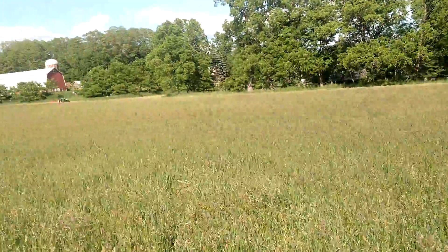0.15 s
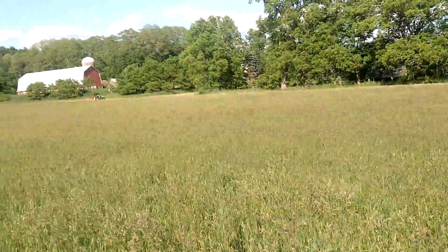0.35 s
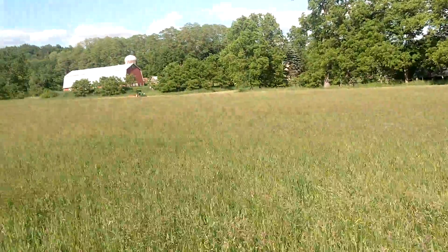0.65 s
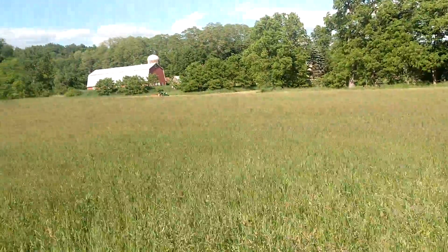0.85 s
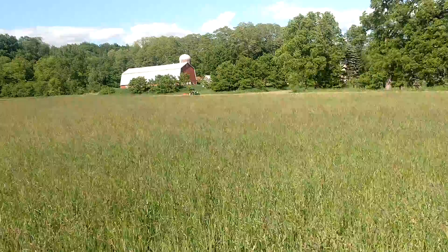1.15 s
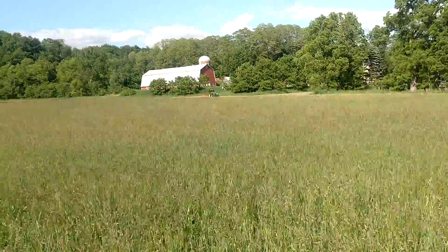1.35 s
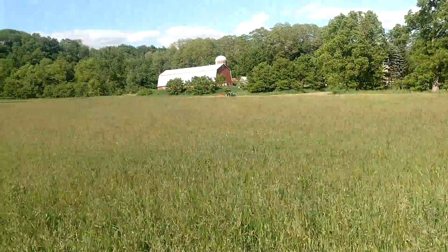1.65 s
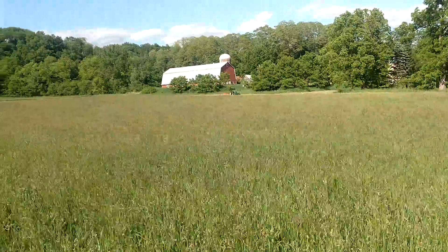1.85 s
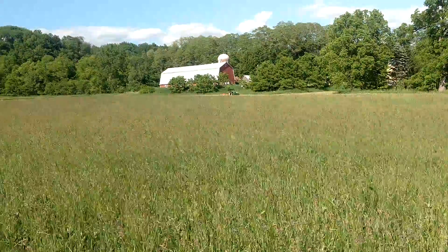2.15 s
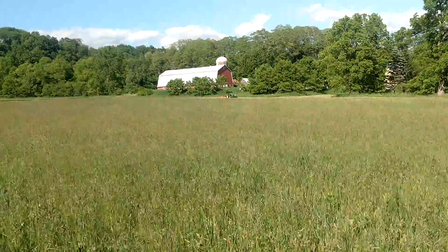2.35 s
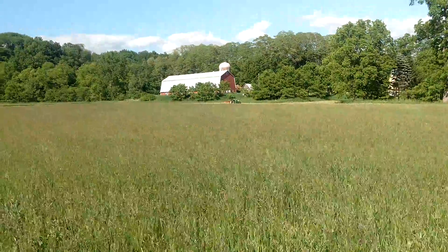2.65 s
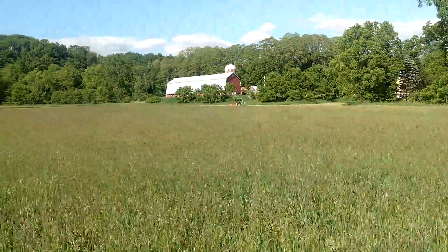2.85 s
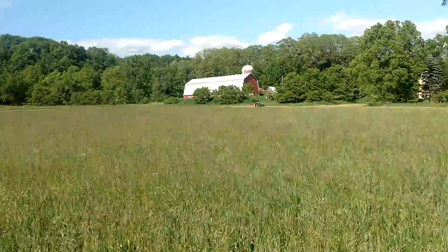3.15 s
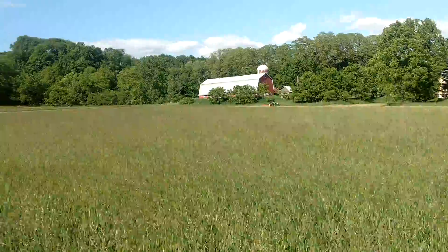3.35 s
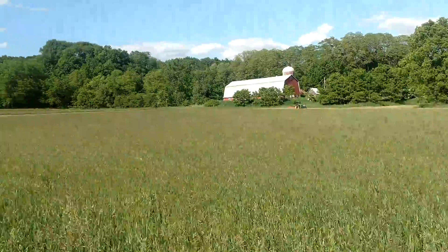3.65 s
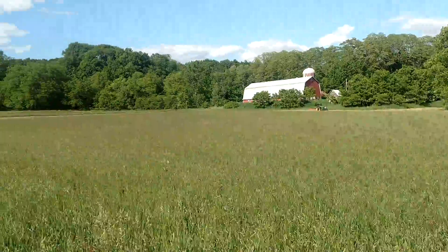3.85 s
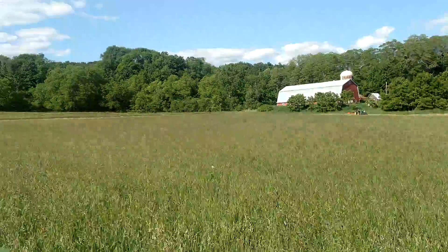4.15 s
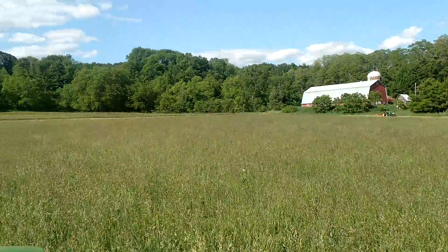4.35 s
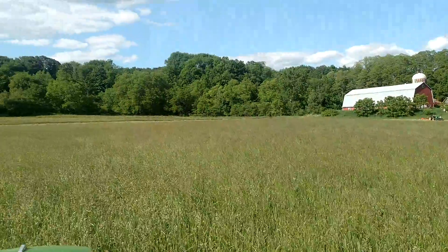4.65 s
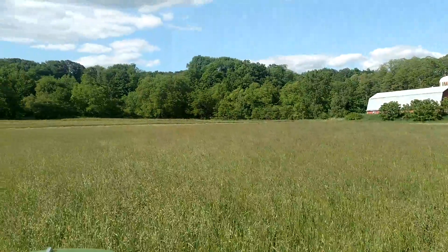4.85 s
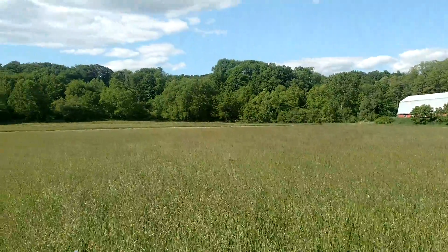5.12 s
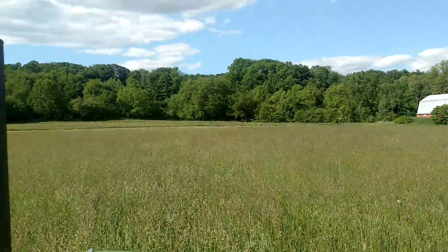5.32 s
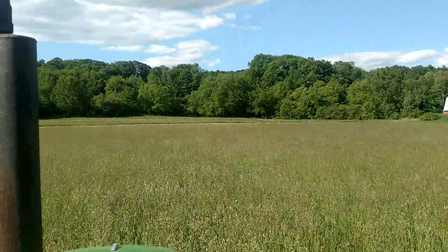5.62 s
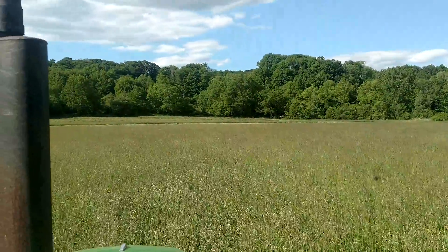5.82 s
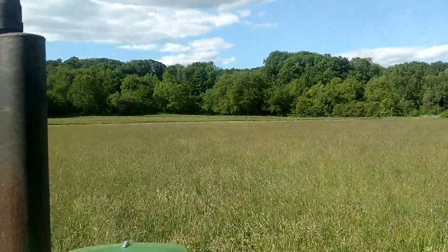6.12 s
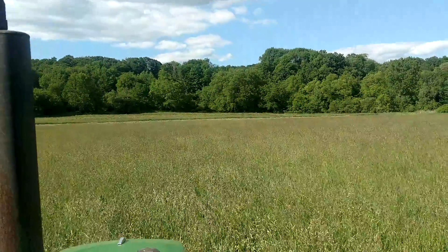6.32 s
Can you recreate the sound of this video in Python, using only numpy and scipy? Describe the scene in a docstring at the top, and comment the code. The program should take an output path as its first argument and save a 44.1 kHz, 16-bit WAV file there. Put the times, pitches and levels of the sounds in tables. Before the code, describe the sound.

A diesel tractor engine runs steadily at high working speed with fan hum, gear whine, throbbing mower drive and hissing cut grass, heard from the seat.

```python
"""Tractor mowing hay

A three-cylinder diesel runs at a governed speed, heard from the open driver's seat. Combustion knock repeats
each engine cycle over a random rush of fan air and cut grass. Fan and rotors hum, gears whine and the mower
drive sings in throbs, all as roughened partials; a dry joint chirps and wind puffs on the microphone.
From just before four seconds the microphone turns from the field to face the bonnet."""
import sys
import numpy as np
from scipy.fft import rfft, irfft
from scipy.io import wavfile
from scipy.ndimage import map_coordinates

SR = 44100
rng = np.random.default_rng(int(sys.argv[2]) if len(sys.argv) > 2 else 0)


def waveform_to_disk(signal):
    """Save audio, clipped to [-1, 1], as 16-bit WAV at the path in sys.argv[1]."""
    frames = np.transpose(np.atleast_2d(signal))
    scaled = np.clip(frames, -1, 1) * 32767
    samples = np.round(scaled).astype(np.int16)
    wavfile.write(sys.argv[1], SR, samples)


N = 285768
TIME = np.arange(N) / SR
FREQ = np.maximum(np.fft.rfftfreq(N, 1 / SR), 1)

# Strong engine lines. Each row: multiple of the four-stroke cycle rate (rounded in use),
# relative level in dB facing the field, relative level in dB facing the bonnet.
ENGINE_LINES = [(6, -37.5, -41), (9, -33, -30), (10, -39, -35.5), (26, -34.5, -42), (30, -36.5, -36),
                (31, -43.5, -31.5), (33, -34.5, -30), (35, -41, -31), (42, -60.5, -32), (47, -32, -40),
                (66.06, -33.5, -32.5), (68.8, -40, -49), (72.26, -32, -27)]


def undb(db):
    """Decibels to gain."""
    return 10 ** (np.asarray(db) / 20)


def curve(rows):
    """A table of time and value, joined by straight lines at every sample."""
    time_s, value = np.transpose(rows)
    return np.interp(TIME, time_s, value)


def shape(points):
    """A frequency table joined on a log axis."""
    hz, value = np.transpose(points)
    return np.interp(np.log(FREQ), np.log(hz), value)


def colour(x, gain):
    """Filter by a gain for each frequency."""
    return irfft(rfft(x) * gain, N)


def walk(rate_hz):
    """Smooth chance of unit spread: noise through a Gaussian low-pass of the given width."""
    x = colour(rng.standard_normal(N), np.exp(-.5 * (FREQ / rate_hz) ** 2))
    return x / x.std()


def swell(from_crest_s, length_s):
    """A rounded rise and fall."""
    return np.exp(-(2 * from_crest_s / length_s) ** 2)


def place(x, pan_db, lag_ms=0):
    """A source at both ports; a positive lag reaches the left port late."""
    left = colour(x, np.exp(-2j * np.pi * FREQ * lag_ms / 10 ** 3))
    return np.array([left * undb(pan_db / 2), x * undb(-pan_db / 2)])


def turned(start_s=3.78, length_s=0.97, before=0.14):
    """Share of the turn towards the bonnet, 0-1, part of it made before the start."""
    return before + (1 - before) * np.clip((TIME - start_s) / length_s, 0, 1)


def swing(x, field, bonnet):
    """The turn crossfades a source between two places, each (pan dB, lag ms)."""
    return place(x * (1 - turned()), *field) + place(x * turned(), *bonnet)


def load():
    """How far the crop is above or below its mean thickness, in dB; it also loads the engine."""
    # Crop thickness, as the level of its hiss. Each row: time in seconds, level in dB (only its swing counts).
    crop_rows = [(0.0, -33.5), (0.11, -35), (0.61, -35), (0.85, -32.5), (0.9, -36.5), (1.46, -33),
                 (2.02, -36), (2.4, -33), (2.45, -36), (2.96, -34.5), (3.3, -35), (3.48, -33), (3.93, -36),
                 (3.97, -32.5), (4.78, -34), (4.95, -32), (5.0, -34), (6.48, -34)]
    crop_db = curve(crop_rows)
    return crop_db - crop_db.mean()


def tone(hz, partials, wander, rough, rough_hz):
    """A turning part: its speed wanders, and play between the parts spreads each line into a skirt."""
    angle = 2 * np.pi * np.cumsum(hz * (1 + wander * walk(3.13))) / SR
    out = 0
    for k, db in partials:
        spread = rough * np.sqrt(k)
        play = walk(rough_hz) + 1j * walk(rough_hz)
        skirt = (1 + spread * play) / np.sqrt(.5 + spread ** 2)
        out = out + undb(db) * np.real(skirt * np.exp(1j * k * angle))
    return out


def wind(centre_hz=72, spread=.24, puff_s=0.087, breeze_db=-47):
    """Eddies push the two ports in opposite directions."""
    # Puffs of wind on the microphone. Each row: crest in seconds, level in dB.
    puffs = [(.82, -26), (1.1, -36), (1.92, -34), (2.7, -39), (5.5, -27)]
    band = np.exp(-.5 * (np.log(FREQ / centre_hz) / spread) ** 2)
    eddies = colour(rng.standard_normal(N), band)
    strength = undb(breeze_db + 3 * walk(3))
    for crest_s, db in puffs:
        strength = strength + undb(db) * np.exp(-.5 * ((TIME - crest_s) / puff_s) ** 2)
    return eddies / eddies.std() * strength * np.array([[1], [-.8]])


def bouts(rest_db=-47, fade_s=0.08):
    """The joint chirps in bouts that fade in, hold and fade out."""
    # Bouts of chirping. Each row: start in seconds, length in seconds, level in dB, added to the rest level.
    bout_rows = [(.13, 0.15, -40.5), (1.044, 0.46, -42.5), (2.03, 0.4, -44), (4.548, 0.5, -38.5),
                 (5.49, 0.18, -41), (5.872, 0.14, -38)]
    level = undb(rest_db)
    for start_s, length_s, db in bout_rows:
        to_edge_s = np.minimum(TIME - start_s, start_s + length_s - TIME)
        level = level + undb(db) * np.clip(.5 + to_edge_s / fade_s, 0, 1)
    return level


def squeak(base_hz=3395, shake_hz=14.5, bend=0.011, rub_depth=0.48, chatter_db=1):
    """A dry joint rubs unevenly, hardest once per shake, its pitch bending as it goes."""
    shake = 2 * np.pi * np.cumsum(shake_hz * (1 + .3 * walk(7))) / SR
    rub = np.exp(rub_depth * np.cos(shake)) * undb(chatter_db * walk(15))
    bent_hz = base_hz * (1 - bend * np.sin(shake))
    # one partial, at 0.99 of the base
    chirp = tone(bent_hz, [(0.99, 0)], wander=0.0069, rough=0.31, rough_hz=55)
    return chirp * rub / np.sqrt(np.mean(rub ** 2)) * bouts()


def mower_rotor(speed, rotor_hz=377.8, field_db=-28, bonnet_db=-37):
    """The rotors hum as a close pair of rough lines, weaker facing the bonnet."""
    # Each row: multiple of the rotor rate, relative level in dB.
    partials = [(1, 0), (1.062, -5)]
    level_db = field_db + turned() * (bonnet_db - field_db)
    return tone(rotor_hz * speed, partials, wander=0.002, rough=0.23, rough_hz=6.0) * undb(level_db)


def throbs(rate_hz=3.38, crest_s=0.32, length_s=.15, throb_db=-35, rest_db=-44, surge_s=0.12):
    """The mower drive throbs at a steady rate over a rest level and swells harder at times."""
    # Stronger swells of the drive's singing. Each row: crest in seconds, added level in dB.
    surge_rows = [(1.52, -32), (2.18, -37.5), (2.95, -33.5), (3.46, -30.5), (3.95, -35), (4.36, -27),
                  (5.359, -31.5), (5.71, -37)]
    from_crest_s = (((TIME - crest_s) * rate_hz + .5) % 1 - .5) / rate_hz
    level = undb(rest_db) + undb(throb_db) * swell(from_crest_s, length_s)
    for surge_crest_s, db in surge_rows:
        level = level + undb(db) * swell(TIME - surge_crest_s, surge_s)
    return level


def mower_drive(speed, drive_hz=942.5):
    """The mower drive sings at its tooth rate and multiples, in throbs."""
    # Each row: multiple of the tooth rate, relative level in dB.
    partials = [(1, 0.5), (2, -14), (3, -15), (5, -27)]
    return tone(drive_hz * speed, partials, wander=0.00297, rough=0.56, rough_hz=28) * throbs()


def gear_whine(speed, gear_hz=844.2):
    """Transmission teeth whine at their meshing rate and its multiples."""
    # Each row: multiple of the tooth rate, relative level in dB.
    partials = [(1, -7.5), (2, 3), (3, -7), (4, -10), (5, -13), (6, -14)]
    # Course of the whine. Each row: time in seconds, level in dB.
    level_rows = [(0.0, -27), (0.14, -35), (0.79, -33), (1.03, -41), (1.19, -33.5), (4.04, -31.5),
                  (4.1, -40), (5.07, -29.5), (5.47, -40.5), (5.63, -32), (5.97, -38.5), (6.14, -27),
                  (6.48, -42)]
    whine = tone(gear_hz * speed, partials, wander=0.001215, rough=0.22, rough_hz=17.5)
    return whine * undb(curve(level_rows))


def fan_level(level_db=-21, load_share=0.9, flutter_db=0.73, beat_hz=4.06, beat_crest_s=0.13, beat_db=1.0):
    """The fan hum beats against the engine, flutters by chance and grows with the load."""
    beat = np.cos(2 * np.pi * beat_hz * (TIME - beat_crest_s))
    return undb(level_db + load_share * load() + beat_db * beat + flutter_db * walk(2.2))


def cooling_fan(speed, fan_hz=199.25):
    """The fan hums at its blade rate."""
    # Each row: multiple of the blade rate, relative level in dB.
    partials = [(1, 0), (2, -15)]
    return tone(fan_hz * speed, partials, wander=0.0017, rough=0.092, rough_hz=26) * fan_level()


def knock(cycles, decay, depth, uneven):
    """Three firings a cycle, each dying away; one cylinder knocks harder."""
    firing = 1 + depth * np.exp(-(3 * cycles % 1) / decay)
    push = firing * (1 + uneven * np.cos(2 * np.pi * cycles))
    return push / np.sqrt(np.mean(push ** 2))


def clatter(cycles, size=8192, firing_db=4.0):
    """Valves, injectors and pistons make the same rattle in every cycle; multiples of the firing rate stand out."""
    push = knock(np.arange(size) / size, decay=0.068, depth=1.0, uneven=0.12)
    lines = rfft(rng.standard_normal(size) * push)
    k = np.arange(len(lines))
    below_nyquist = k * cycles[-1] / TIME[-1] < SR / 2
    lines = lines / abs(lines) * undb(firing_db * (k % 3 == 0)) * below_nyquist
    lines[[round(row[0]) for row in ENGINE_LINES]] = 0  # the exhaust and block sound these
    x = map_coordinates(irfft(lines), [cycles % 1 * size], order=3, mode="grid-wrap")
    return x / x.std()


def drone(cycles, waver=0.56, flutter_db=1.7):
    """Exhaust and engine block ring on a few cycle multiples, which change as the listener turns."""
    turn, out = turned(), 0
    for k, field_db, bonnet_db in ENGINE_LINES:
        line = np.cos(2 * np.pi * (round(k) * cycles + rng.random()) + waver * walk(7.9))
        level_db = field_db + turn * (bonnet_db - field_db) + flutter_db * walk(1.4)
        out = out + np.sqrt(2) * undb(level_db) * line
    # the upper lines come off the block, to one side; the exhaust boom surrounds the seat
    block = colour(out, 1 / (1 + (700 / FREQ) ** 6))
    return place((out - block) * undb(-2.5), 2.0) + place(block * undb(-6.0), 8.7)


def machine(cycles, left_db=1.5, rush_db=-2, load_share=0.69, hiss_share=0.91, hiss_hz=2200,
            panel_hz=560, patchy_db=2, bonnet_db=1.5, roar_flutter_db=.5, hiss_flutter_db=0.79):
    """Repeating clatter plus a random rush of air, combustion and cut grass, arriving from all sides."""
    # Broad sound of the whole machine. Each row: frequency in Hz, relative level in dB per Hz.
    spectrum = [(30, -84), (52, -58.5), (100, -48.5), (170, -50.5), (290, -55.5), (480, -49.5),
                (1000, -50.5), (1280, -50), (1550, -54), (1900, -54), (2300, -56.5), (3000, -61.5),
                (5400, -65), (11300, -74.5), (15000, -79.5)]
    # Clatter that repeats with the engine cycle. Each row: frequency in Hz, relative level in dB.
    repeating = [(60, -3), (250, -4.5), (700, -5.5), (1200, -2.5), (2000, -10.5), (5000, -9.5),
                 (12000, -45)]
    # Likeness of the two ports. Each row: frequency in Hz, correlation (clipped to +-1 in use).
    likeness = [(55, -1.38), (100, -0.71), (170, 0.45), (280, 1), (390, 0.61), (600, 0.77), (1000, -0.26),
                (2000, -0.0067)]
    rattle = colour(np.array([clatter(cycles), clatter(cycles)]), undb(shape(repeating)))
    rush = undb(rush_db) * rng.standard_normal((2, N))
    a, b = rfft(rattle + rush) * undb(shape(spectrum)) * np.sqrt(SR / 2)
    alike = np.clip(shape(likeness), -1, 1)
    mid, side = a * np.sqrt((1 + alike) / 2), b * np.sqrt((1 - alike) / 2)
    ports = irfft(np.array([mid + side, mid - side]), N) * undb([[left_db / 2], [-left_db / 2]])

    # the roar pulses with the firings and swells with the load; the hiss follows the grass
    hiss = colour(ports, 1 / (1 + (hiss_hz / FREQ) ** 4))
    roar_db = load_share * load() + roar_flutter_db * walk(5.9)
    hiss_db = hiss_share * load() + hiss_flutter_db * walk(12)
    # loose panels shudder unevenly, louder facing the bonnet
    panels = colour(ports, np.exp(-(np.log(FREQ / panel_hz) / 0.13) ** 2))
    shudder = undb(patchy_db * walk(15) + bonnet_db * turned()) - 1
    roar = ports - hiss + panels * shudder
    roar = roar * knock(cycles, decay=0.059, depth=0.16, uneven=0.03) * undb(roar_db)
    return roar + hiss * knock(cycles, decay=0.23, depth=0.19, uneven=0.011) * undb(hiss_db)


def scene(start_rpm=1950, creep_rpm_per_s=.8):
    """All but the joint and the wind turns with the crankshaft, governed but creeping up a little."""
    rpm = start_rpm + creep_rpm_per_s * TIME
    cycles = np.cumsum(rpm / 120) / SR  # two turns a cycle
    speed = rpm / rpm.mean()
    mower = place(mower_rotor(speed), 0.89) + place(mower_drive(speed), 15.5)
    gears = swing(gear_whine(speed), (11, .08), (9, -.11))
    fan = swing(cooling_fan(speed), (4.4, .94), (2.2, .94))
    engine = machine(cycles) + drone(cycles)
    return wind() + place(squeak(), 3.2) + mower + gears + fan + engine


def record(dry, port_lag_s=.000456, top_hz=15750, edge_fade_s=.005):
    """Each channel subtracts the delayed far port to point sideways; bass and top treble stay unsteered."""
    # Far port that each channel subtracts. Each row: frequency in Hz, share 0-1.
    steering = [(430, 0), (650, 0.41), (1000, 1), (2200, 1), (4400, 0.6), (6400, 0.49), (8500, 0.12),
                (9800, 0)]
    # Treble difference of the ports. Each row: frequency in Hz, left minus right in dB.
    port_balance = [(5500, 0), (8000, 3.5), (10000, 0), (13000, -2), (15500, -1)]
    ports = dry * np.minimum(1, np.minimum(TIME, TIME[::-1]) / edge_fade_s)
    steer = np.clip(shape(steering), 0, 1)
    far = colour(ports[::-1], steer * np.exp(-2j * np.pi * FREQ * port_lag_s))
    balance = undb(shape(port_balance) * np.array([[.5], [-.5]]))
    cut = 1 / np.sqrt(1 + (FREQ / top_hz) ** 400)
    return colour(ports - far, balance * cut / np.sqrt(1 + steer ** 2))


dry = scene()
out = record(dry)
waveform_to_disk(out)
```